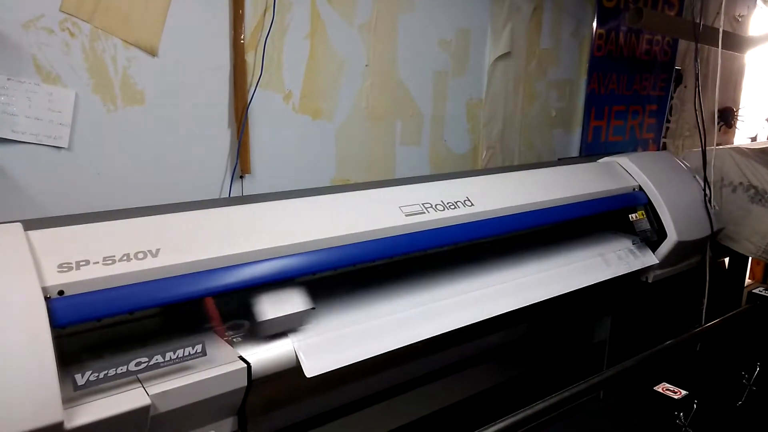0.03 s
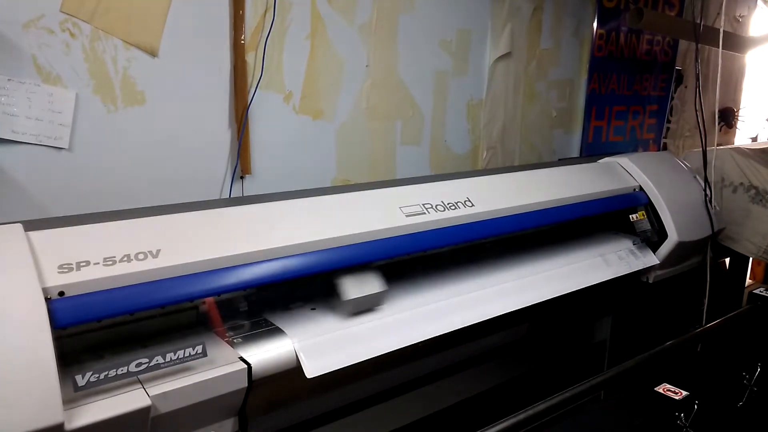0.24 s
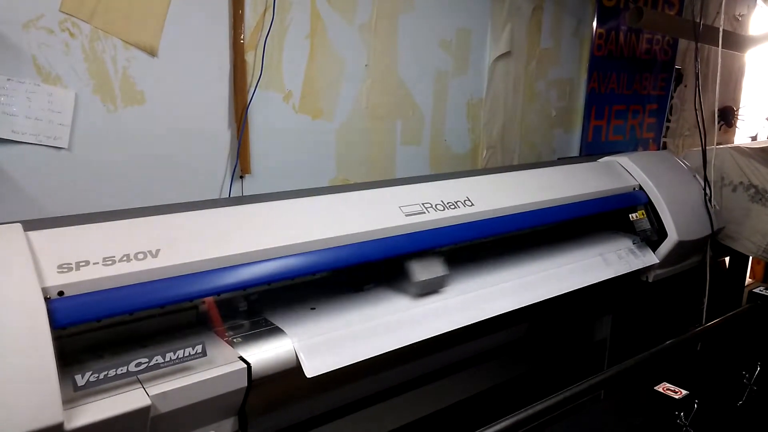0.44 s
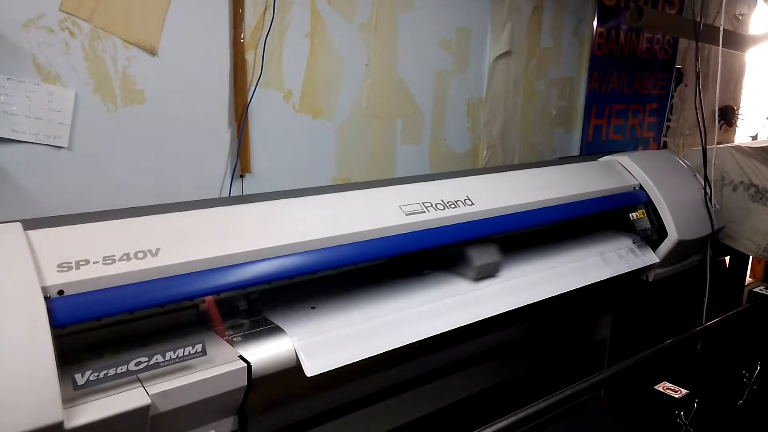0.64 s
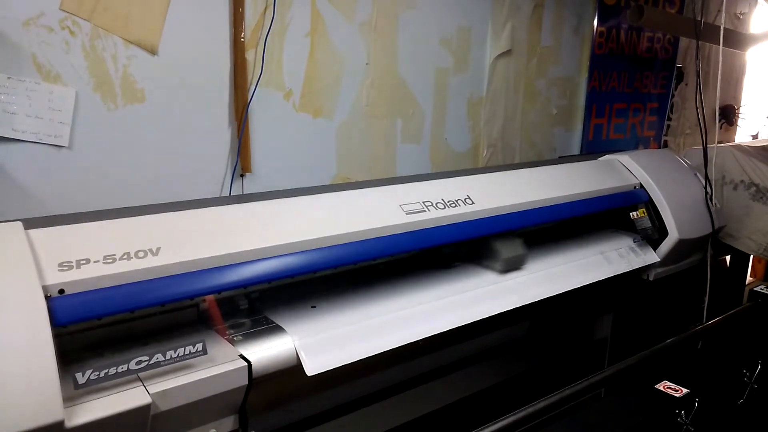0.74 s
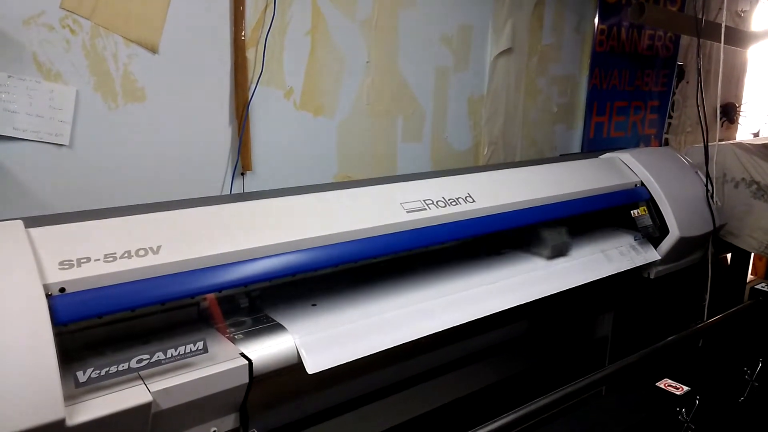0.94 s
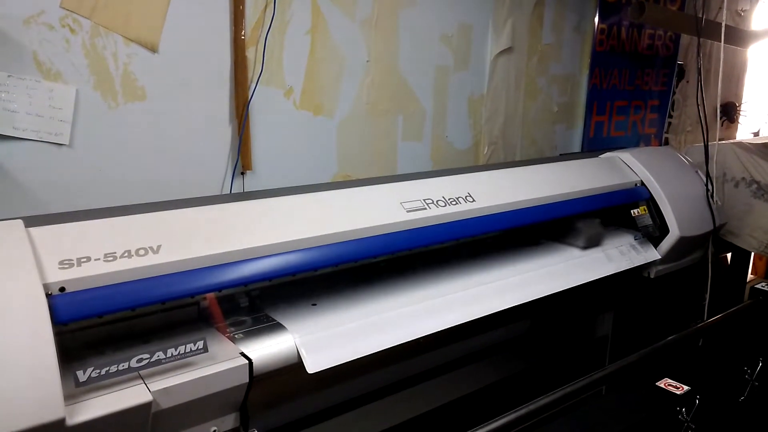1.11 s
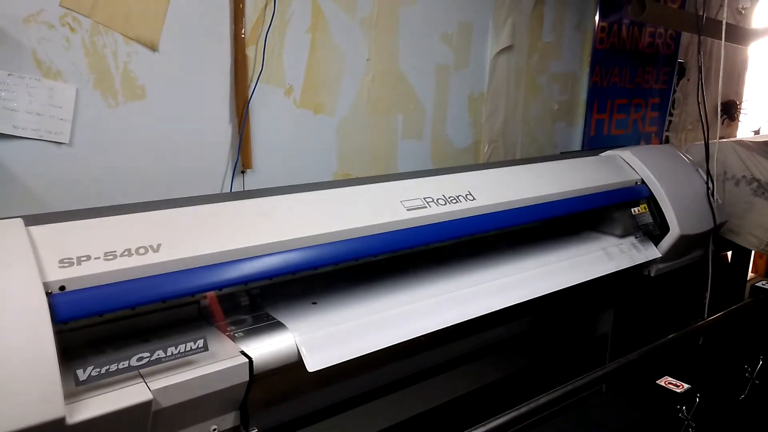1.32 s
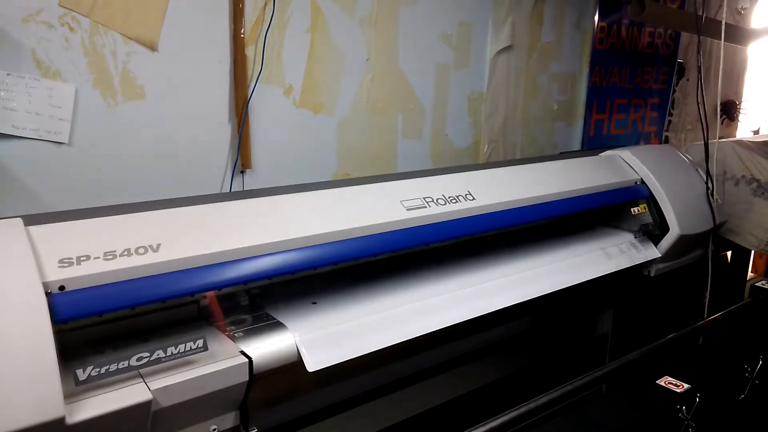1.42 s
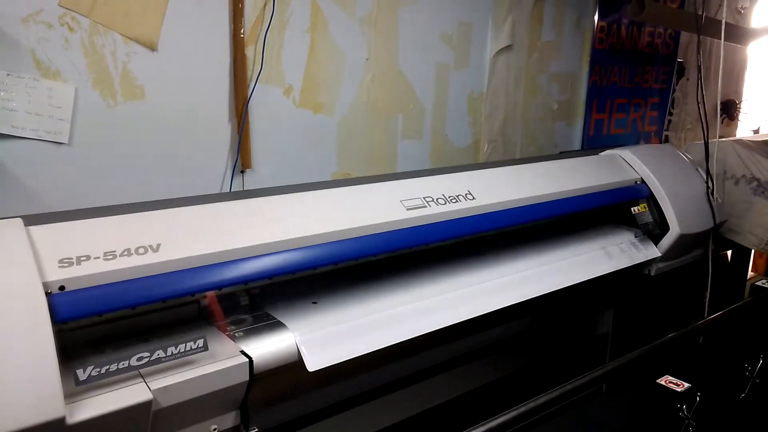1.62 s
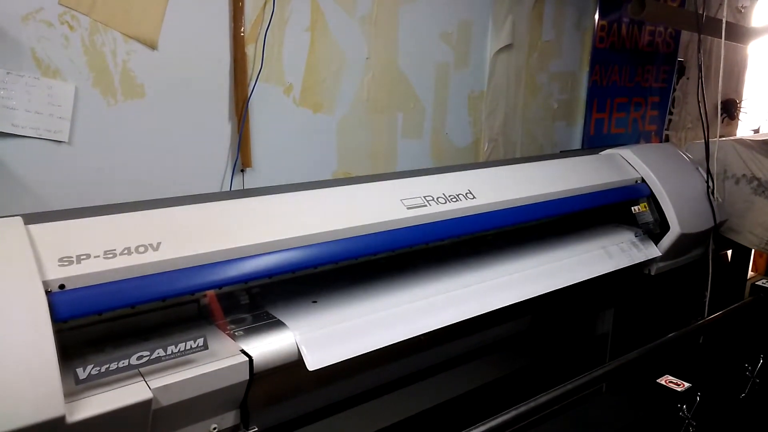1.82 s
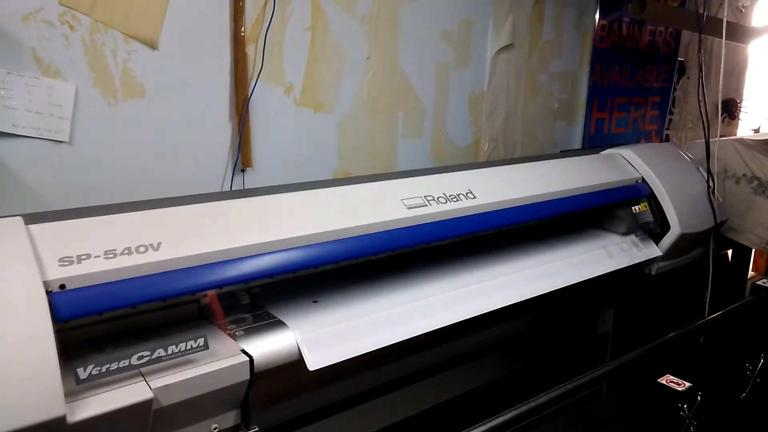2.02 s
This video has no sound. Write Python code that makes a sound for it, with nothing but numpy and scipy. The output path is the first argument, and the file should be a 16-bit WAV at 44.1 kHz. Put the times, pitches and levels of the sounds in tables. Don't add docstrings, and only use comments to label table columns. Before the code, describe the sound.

A large-format printer's carriage sweeps across, hissing and whining, pauses near the end, then returns

```python
import sys
import numpy as np
from scipy import signal
from scipy.fft import rfft, irfft, dct, next_fast_len
from scipy.io import wavfile

SR = 44100
rng = np.random.default_rng(int(sys.argv[2]) if len(sys.argv) > 2 else 0)


def unload_audio(sound):
    columns = np.transpose(np.atleast_2d(sound))
    steps = np.round(np.clip(columns, -1, 1) * 32767)
    wavfile.write(sys.argv[1], SR, steps.astype(np.int16))


def undo_db(level):
    steps = np.asarray(level, float) / 20
    return 10 ** steps


N = 90713
CRUISE_DB = -44


def in_time(rows):
    return np.interp(np.arange(N) / SR, *np.transpose(rows))


def at_hz(points, hz):
    points = np.array(points)
    return np.interp(np.log(hz), np.log(points[:, 0]), points[:, 1])


def drift(rate):
    r = np.exp(-80 * np.pi * rate / SR)
    slow = signal.lfilter([1], [1, -2 * r, r * r], rng.standard_normal(N // 40 + 2002))[2000:]
    return np.interp(np.arange(N) / 40, np.arange(len(slow)), slow / slow.std())


# frequency in Hz, left-right likeness from -1 to 1.
PORT_LIKENESS = [(25, 0.036), (60, -0.99), (180, -0.93), (550, -0.86), (1650, -0.18), (4970, 0.057),
                 (15000, -0.092)]


def likeness_at(hz):
    return np.clip(at_hz(PORT_LIKENESS, hz), -.97, .97)


def alike(a, b, likeness):
    return likeness * a + np.sqrt(1 - likeness ** 2) * b


def air(spectrum, lean, patchy_db, shared_db, patch_per_s=13.7):
    size = next_fast_len(N)
    hz = np.maximum(np.arange(size // 2 + 1) * SR / size, 10)
    low, high = spectrum[0][0], spectrum[-1][0]
    a, b = rfft(rng.standard_normal((2, size)))
    likeness, side = likeness_at(hz), undo_db(at_hz(lean, hz) / 2)
    ends = np.log2(np.clip(hz / low, 0, 1) * np.clip(high / hz, 0, 1))
    shape = undo_db(at_hz(spectrum, hz) + 54 * ends) / np.sqrt(side ** 2 + side ** -2 + 2 * likeness)
    pair = shape * np.array([side * a, alike(a, b, likeness) / side])
    place = np.clip(1.5 * np.log2(hz / low), 0, np.ceil(1.5 * np.log2(high / low)))
    together = drift(6)
    out = 0
    for k in range(int(place.max()) + 1):
        band = np.cos(np.pi / 2 * np.clip(place - k, -1, 1)) ** 2
        flicker = undo_db(patchy_db * drift(patch_per_s) + shared_db * together)
        out = out + flicker * irfft(pair * band, size)[:, :N]
    return out / out.mean(axis=0).std()


# frequency in Hz, level in dB per Hz.
SHOP_COLOUR = [(25, -19.5), (100, -6), (220, -14), (620, -6), (1400, -11), (4000, -16), (5600, -23.5),
               (12300, -35), (13300, -60)]
# frequency in Hz, left minus right in dB.
SHOP_SIDE = [(60, 1), (240, 2.8), (950, 3.7), (3770, 0.72), (15000, 1.6)]


def shop_air():
    return undo_db(-68) * air(SHOP_COLOUR, SHOP_SIDE, patchy_db=5.0, shared_db=-0.06, patch_per_s=6.0)


# time in seconds, bearing hiss in dB.
CARRIAGE_MOTION = [ [(0.0, -45.5), (0.02, -44.5), (0.29, -44), (0.31, -44.5), (0.74, -43), (1.57, -45),
                   (1.61, -47), (1.75, -86.5), (1.83, -87), (1.88, -53), (1.9, -46.5), (1.96, -43),
                   (2.06, -43)], ][0]


def carriage():
    hiss_db = in_time(CARRIAGE_MOTION)
    return hiss_db, np.minimum(hiss_db - CRUISE_DB, 0)


# frequency in Hz, level in dB per Hz.
HISS_COLOUR = [(1290, -47), (2200, -9.5), (2730, -10), (3680, -2), (4100, -3.5), (4350, -7.5), (4900, -8.5),
               (5220, -4), (7580, 1), (15100, -5.5), (16000, -16)]
# frequency in Hz, left minus right in dB.
HISS_SIDE = [(2200, 1), (2800, -1.5), (3700, 2), (4300, 1.5), (4800, 2), (5300, 4.5), (6000, 15),
             (7500, 11.5), (10300, 12), (15000, 12.5)]


def bearings(hiss_db, effort_db):
    level_db = hiss_db + 0.68 + 0.48 * np.minimum(effort_db + 29, 0)
    return undo_db(level_db) * air(HISS_COLOUR, HISS_SIDE, patchy_db=1.15, shared_db=0.14)


# time in seconds, share of the band taken.
COVER_SHADE = [(0, 0.065), (.4, 0.18), (.6, 0.071), (1.05, 0.14), (1.25, 0.71), (1.5, .4), (1.9, .3),
               (2.06, 0.074)]
# lower edge in Hz, upper edge in Hz.
COVER_BAND = [2500, 3140]


def shaded(x):
    band = signal.sosfiltfilt(signal.butter(2, COVER_BAND, "band", fs=SR, output="sos"), x[0])
    return x - np.clip(in_time(COVER_SHADE), 0, 1) * band * [[1], [0]]


# frequency in Hz, level in dB per Hz.
COVER_COLOUR = [(150, -113), (250, -39.5), (450, -30.5), (599, -21.5), (768, -25), (898, -22.5),
                (986, -18.5), (1490, -1.5), (1690, -9), (3000, -28), (3900, -102), (6600, -120)]
# frequency in Hz, left minus right in dB.
COVER_SIDE = [(60, 2.0), (130, 16), (290, -3.5), (640, 10.5), (1410, 15), (3100, -3.5), (6820, 13.5),
              (15000, 10)]


def covers():
    return undo_db(CRUISE_DB - 5) * air(COVER_COLOUR, COVER_SIDE, patchy_db=1.5, shared_db=.6)


# pulley order, left port in dB, right port in dB.
BELT_TONES = [
    (-1, -62, -58),
    (0, -49.5, -50),
    (1, -50.5, -60),
    (2, -58, -65),
]
# time in seconds, tooth tone at left port in dB, pulley tones in dB.
BELT_SWING = [(0, -12, 2.5), (.25, -5.5, 2.5), (.35, -8, 0), (.55, -2.5, -7.5), (.85, -1, 1),
              (.95, 0.5, -8), (1.05, 1.5, -1), (1.17, -2, -1), (1.25, -9, -8), (1.38, -6, 0.5),
              (1.5, -16, -8), (1.6, -12, -2), (1.9, -18, -13.5), (2.06, -16, -2.5)]


def belt():
    tooth_hz, pulley_hz, wander_hz, flutter_db = 1489.9, 35.6, .35, 1.2
    left_lead = np.array([[.1], [0]])
    t = np.arange(N) / SR
    wander = np.cumsum(wander_hz * drift(3.5)) / SR
    swing = np.array(BELT_SWING)
    tooth_db, pulley_db = in_time(swing[:, [0, 1]]), in_time(swing[:, [0, 2]])
    out = 0
    for order, left_db, right_db in BELT_TONES:
        cycles = (tooth_hz + order * pulley_hz) * t + wander + rng.random() + left_lead
        flutter = flutter_db * np.array([drift(5.7), drift(12.0)])
        flutter = flutter + (pulley_db if order else tooth_db * [[1], [.2]])
        level = undo_db(np.array([[left_db], [right_db]]) + flutter)
        out = out + level * np.sqrt(2) * np.sin(2 * np.pi * cycles)
    return out


# frequency in Hz, width in Hz, left in dB, right in dB.
RAIL_RESONANCES = [(354, 2.8, -69.5, -77.5), (577, 16, -68.5, -71.5), (870, 12, -72.5, -66),
                   (913.4, 5, -61, -67.5), (1070, 8.3, -58.5, -68), (1121, 12, -64, -67),
                   (1247, 16, -60, -70), (1405, 12, -58, -72.5), (1265, 8.1, -66.5, -58.5),
                   (1225, 35, -69.5, -63), (1467, 120, -62.5, -56.5), (1487, 160, -55, -58),
                   (1579, 36, -58, -61), (1797, 32, -52, -57.5), (1962, 39, -55, -68.5),
                   (2148, 14, -68, -72.5)]


def rail():
    out = 0
    for hz, width, left_db, right_db in RAIL_RESONANCES:
        r = np.exp(-np.pi * width / SR)
        poles = [1, -2 * r * np.cos(2 * np.pi * hz / SR), r * r]
        rough = rng.standard_normal((2, N + SR // 4))
        a, b = signal.lfilter([1, 0, -1], poles, rough)[:, -N:]
        pair = np.array([a * undo_db(left_db), alike(a, b, likeness_at(hz)) * undo_db(right_db)]) / a.std()
        out = out + pair * undo_db(2.2 * drift(24))
    return out


# middle in seconds, length
# in seconds, frequency in Hz, left in dB, right in dB.
FRAME_SHUDDERS = [(0.038, 0.031, 389.5, -50, -59), (0.048, 0.14, 1090, -82, -52.5),
                  (0.033, 0.12, 1290, -69, -50), (0.25, 0.034, 832, -49.5, -64),
                  (0.031, 0.04, 643, -59.5, -71), (0.11, 0.074, 355, -48, -63),
                  (0.15, 0.18, 412.2, -52.5, -61), (0.17, 0.19, 350, -56.5, -65.5),
                  (0.305, .1, 349, -57, -66.5), (0.18, 0.075, 98.4, -55, -65),
                  (0.265, 0.12, 95.2, -52.5, -58), (0.26, 0.065, 908, -56.5, -72),
                  (0.77, 0.064, 105, -58.5, -59.5), (0.835, 0.042, 370, -53.5, -53.5),
                  (0.94, 0.085, 890, -49.5, -57.5), (1.117, 0.032, 913, -47.5, -76),
                  (1.472, 0.034, 510, -53, -58.5), (1.5, 0.039, 893, -53.5, -63),
                  (1.702, 0.043, 590, -61, -72), (1.77, 0.038, 624, -57, -67),
                  (1.829, 0.019, 600, -58, -70), (1.885, 0.045, 1329, -43, -58),
                  (.83, .04, 910, -53.5, -74), (1.05, .04, 905, -55, -70), (1.978, 0.043, 912, -45.5, -62),
                  (2.024, 0.073, 910, -48, -66), (1.87, .015, 3800, -60, -66),
                  (1.942, .03, 4200, -48.5, -53), (2.015, .06, 3800, -45.5, -53),
                  (.1, 0.093, 1500, -46, -58), (1.555, .09, 1530, -49, -60), (1.67, .07, 1490, -65, -72),
                  (1.96, 0.063, 1610, -48, -58), (0.028, 0.046, 500, -54, -61),
                  (0.065, 0.055, 810, -53.5, -65), (.39, 0.044, 340, -59, -66),
                  (.475, 0.036, 360, -57, -67), (1.605, 0.071, 300, -64, -74), (1.625, .06, 520, -60, -69),
                  (0.396, 0.066, 1400, -48, -62), (0.63, 0.07, 1260, -47.5, -64),
                  (0.31, .1, 1850, -60, -52.5), (1.3, 0.094, 120, -63, -67)]


def frame():
    shake_rad, shake_per_s = .9, 16
    t, out = np.arange(N) / SR, 0
    for s, length, hz, left_db, right_db in FRAME_SHUDDERS:
        shake = shake_rad * max(1, hz / 1500) * drift(shake_per_s * max(1, hz / 900))
        tone = np.sqrt(2) * np.sin(2 * np.pi * hz * t + shake)
        swell = np.exp(-4 * ((t - s) / length) ** 2) * tone * undo_db(3.0 * drift(34))
        out = out + swell * [[undo_db(left_db)], [-undo_db(right_db)]]
    return out


def motor():
    middle_s, length_s, hz = 1.785, .04, 14700
    t = np.arange(N) / SR
    swell = undo_db(-87) * np.exp(-4 * ((t - middle_s) / length_s) ** 2)
    return swell * np.sin(2 * np.pi * hz * t) * [[1], [.3]]


def scene():
    hiss_db, effort_db = carriage()
    body = undo_db(0.89 * effort_db)
    moving = shaded(bearings(hiss_db, effort_db)) + body * (covers() + belt() + rail())
    return shop_air() + moving + frame() + motor()


# frequency in Hz, step size in dB.
ROUNDING_STEP = [(200, -21), (800, -22), (1200, -12), (1900, 1.), (2700, 3), (3700, 6.5), (4800, 4.5),
                 (6300, .5), (13000, .5), (15500, -2.5)]


def phone_rounding(x):
    size, grid = 1024, 624
    count = N // size + 2
    window = np.sin(np.pi * (np.arange(2 * size) + .5) / (2 * size))
    wide = np.pad(x, [(0, 0), (2 * size - grid, 2 * size)])
    frames = np.stack([wide[:, i * size:(i + 2) * size] * window for i in range(count)], axis=1)
    a, b, c, d = np.split(frames, 4, axis=2)
    coef = dct(np.concatenate([-c[..., ::-1] - d, a - b[..., ::-1]], axis=2), type=4, norm="ortho")
    level_db = 10 * np.log10(np.mean(coef[..., size // 10:] ** 2, axis=(0, 2)) + 1e-14)[:, None]
    hz = (np.arange(size) + .5) * SR / 2 / size
    spread = signal.lfilter([.75], [1, -.66], rng.standard_normal((count, size // 16)), axis=0)
    spread = np.repeat(spread, 16, axis=1)
    step = undo_db(-37.9 + .93 * (level_db + 39.5) + at_hz(ROUNDING_STEP, hz) + 1.8 * spread)
    coef = np.sign(coef) * step * np.floor((abs(coef) / step) ** .75 + .4054) ** (4 / 3)
    u, v = np.split(dct(coef, type=4, norm="ortho"), 2, axis=2)
    frames = np.concatenate([v, -v[..., ::-1], -u[..., ::-1], -u], axis=2) * window
    out = np.zeros_like(wide)
    for i in range(count):
        out[:, i * size:(i + 2) * size] += frames[:, i]
    return out[:, 2 * size - grid:][:, :N]


def low_pass(x):
    return signal.sosfilt(signal.butter(12, 17020, fs=SR, output="sos"), x)


def record(dry):
    x = signal.sosfilt(signal.ellip(12, .3, 80, 15700, fs=SR, output="sos"), dry)
    mix = phone_rounding(x)
    return low_pass(mix)


dry = scene()
out = record(dry)
unload_audio(out)
```